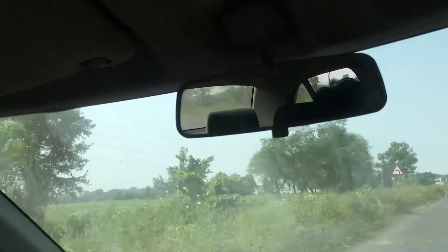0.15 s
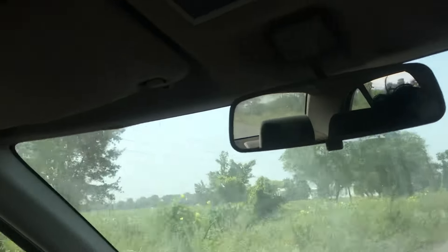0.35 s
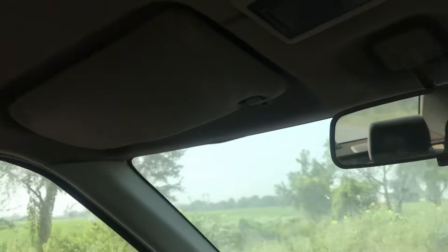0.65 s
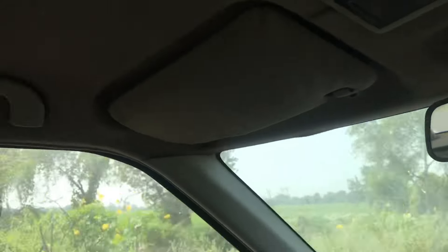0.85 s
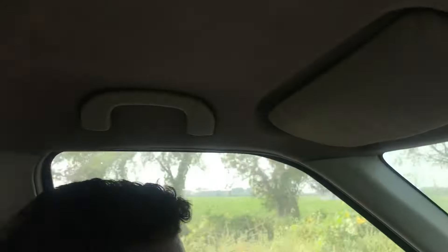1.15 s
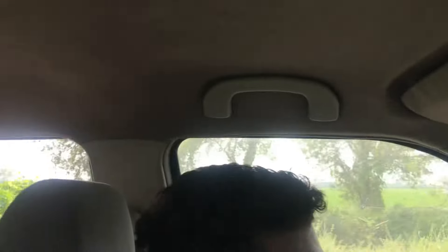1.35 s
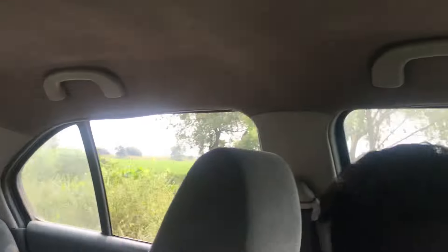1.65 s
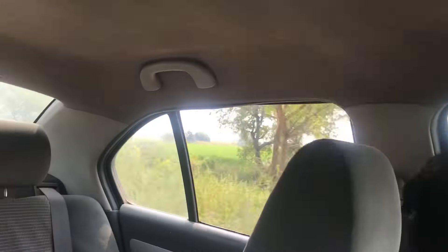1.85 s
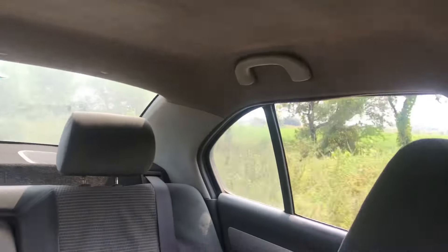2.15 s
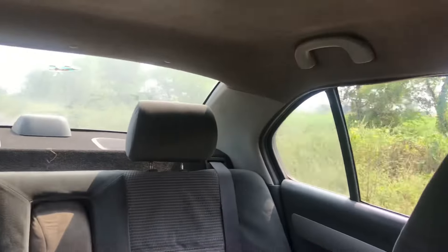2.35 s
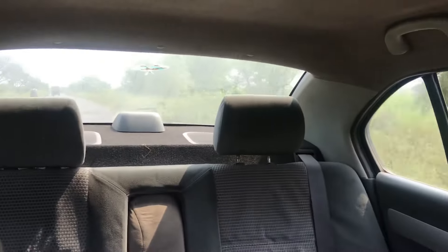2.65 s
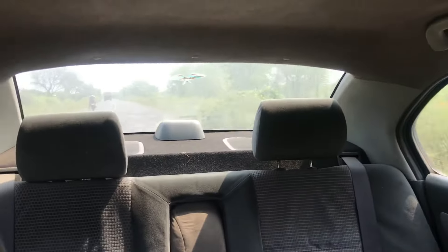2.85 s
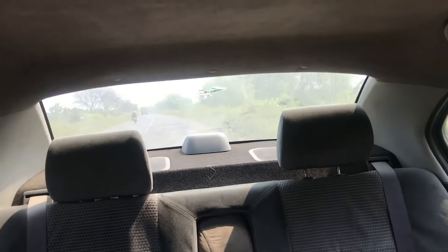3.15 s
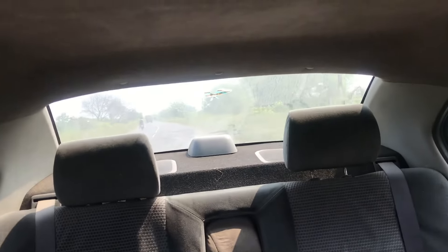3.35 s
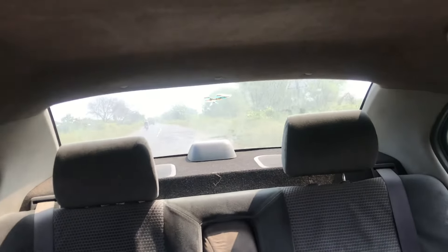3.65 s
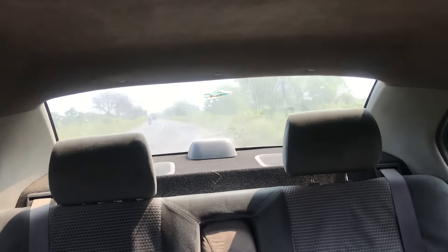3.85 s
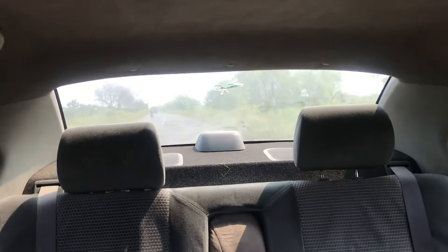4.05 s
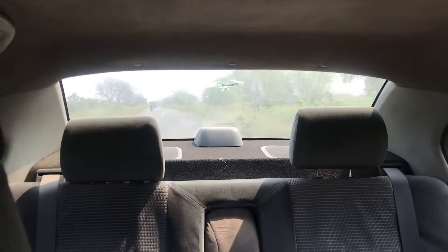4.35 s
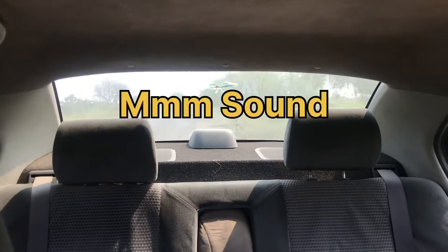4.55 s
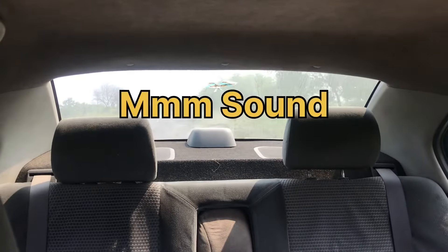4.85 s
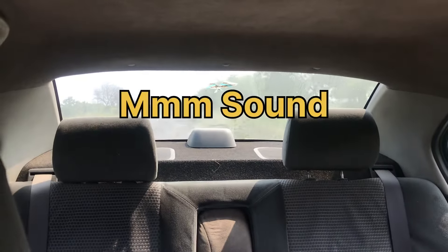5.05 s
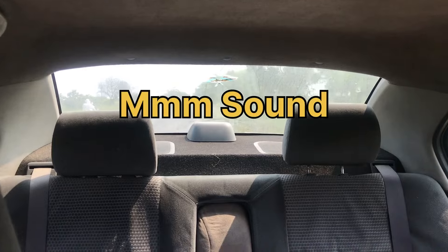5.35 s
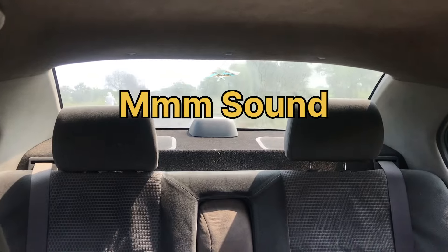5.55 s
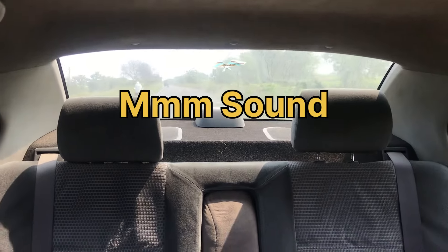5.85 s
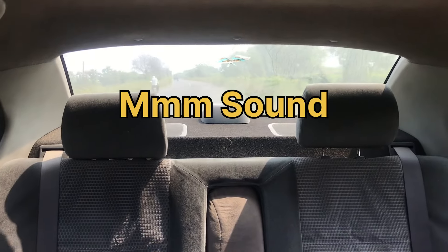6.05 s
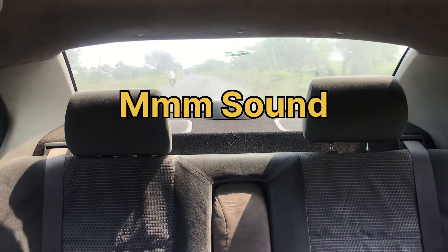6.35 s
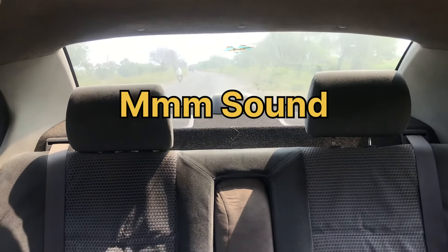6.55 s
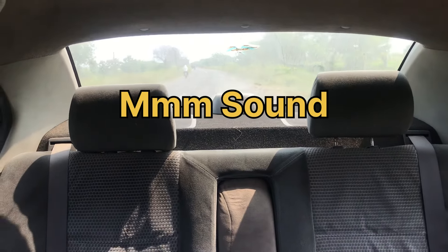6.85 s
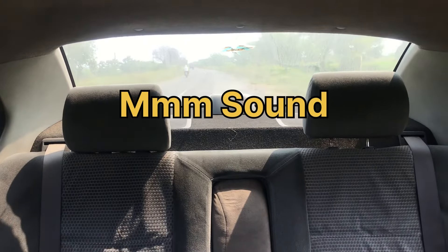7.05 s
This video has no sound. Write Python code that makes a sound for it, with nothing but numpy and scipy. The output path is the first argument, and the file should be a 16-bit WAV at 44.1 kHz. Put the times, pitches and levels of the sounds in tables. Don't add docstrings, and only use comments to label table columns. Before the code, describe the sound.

A microphone in a car cabin turns from windscreen to rear seat. Low engine and bearing hum sits in bassy road noise, with thumps and plastic clacks early on. The ride eases, then trim clatters sharply just before a quick two-note horn blip and a bush swish. Afterwards a steadier hum dominates, with faint ticks, thin panel buzz and a slight tyre moan.

```python
import sys
import numpy as np
from scipy import signal
from scipy.io import wavfile
from scipy.ndimage import uniform_filter1d

SR = 44100
rng = np.random.default_rng(int(sys.argv[2]) if len(sys.argv) > 2 else 0)


def amplitude_ratio(level_db):
    exponent = np.asarray(level_db, float) / 20
    return 10 ** exponent


def inscribe(sig):
    pcm = np.round(np.clip(np.atleast_2d(sig).T, -1, 1) * 32767)
    wavfile.write(sys.argv[1], SR, pcm.astype(np.int16))


N = 317079
TIME = np.arange(N) / SR

# time in seconds, level in dB.
SURFACE = [(0, 0.5), (.4, 1.5), (.55, 3.5), (.95, 6), (1.2, 2), (1.35, 1.5), (1.6, 5), (1.9, 3),
           (2.15, -0.5), (3.0, 0.5), (3.5, 0), (4.0, 2.1), (4.3, -1), (5.4, -3.5), (5.7, -3.5), (6.3, -1.5),
           (7.19, -2.2)]


def evened(x):
    return x / np.sqrt(np.mean(x ** 2) + 1e-20)


def curves(rows):
    s, *columns = np.transpose(rows)
    return [np.interp(TIME, s, column) for column in columns]


def add(mix, s, sound):
    part = mix[round(s * SR):][:len(sound)]
    part += sound[:len(part)]


def resonate(x, hz, width_hz):
    r = np.exp(-np.pi * width_hz / SR)
    turn = np.exp(2j * np.pi * hz / SR)
    return 2 * signal.lfilter([1 - r], [1, -r * turn], x + 0j).real


def drift(rate_hz):
    hz = np.geomspace(.1 * rate_hz, rate_hz, 16)[:, None]
    coarse = TIME[::64]
    waves = np.sin(2 * np.pi * (hz * coarse + rng.random(hz.shape))) / np.sqrt(hz)
    return np.interp(TIME, coarse, evened(waves.sum(0)))


def noise(points, size, patchy_db, flicker_db):
    frames, hz = 4 * N // size + 5, np.fft.rfftfreq(size, 1 / SR)
    a, b, patches = rng.standard_normal((frames, len(hz), 3)).T
    patches = uniform_filter1d(patches, size=9, axis=0)
    patches = evened(uniform_filter1d(patches, size=9, axis=1))
    flicker = evened(uniform_filter1d(rng.standard_normal(frames), size=5))
    f, db = np.transpose(points)
    colour_db = np.interp(np.log(hz + 1), np.log(f + 1), db, left=-90, right=-90)
    z = (a + 1j * b) * amplitude_ratio(colour_db[:, None] + patchy_db * patches + flicker_db * flicker)
    return evened(signal.istft(z, nperseg=size, noverlap=3 * size // 4)[1][:N])


def swells(rows):
    out = np.zeros(N)
    for s, half, db in rows:
        t = np.arange(-3 * half, 3 * half, 1 / SR)
        t = t[t >= -s]
        add(out, s + t[0], amplitude_ratio(db) * np.exp(-(t / half) ** 2))
    return out


def by_facing(levels_db):
    # (0 windscreen, 1 side window, 2 rear pillar, 3 the balance after the
    # shift near 4.2 s).
    facing = [(0, 0.023), (1.3, 0.057), (1.8, 0.65), (2.6, 0.9), (3.35, 0.9), (3.6, 1.5), (4.15, 2.18),
              (4.27, 3), (7.19, 2.91)]
    return np.interp(curves(facing)[0], range(4), levels_db)


def boom_gain():
    # time in seconds, level in dB.
    pumps = [(.29, -16.5), (.52, -17.5), (.64, -14), (.86, -34), (.95, -14.5), (1.11, -22), (1.27, -21),
             (1.46, -18.5), (1.69, -19.5), (1.92, -22.5), (2.08, -25), (2.24, -15), (2.43, -28.5),
             (2.69, -26), (2.84, -21.5), (3.07, -22), (3.25, -28.5), (3.43, -31), (3.68, -16.5), (3.8, -15),
             (3.91, -18), (4.11, -33), (4.24, -24), (4.4, -25), (5.0, -25), (5.2, -32.5), (6.871, -18.5),
             (7.05, -20.5), (7.18, -19)]
    pump_s = 0.054
    return amplitude_ratio(by_facing((-32.5, -26.5, -36, -38))) + swells([(s, pump_s, db) for s, db in pumps])


def engine_drone():
    # time in seconds, turning rate in Hz.
    speed = [(0, 22.8), (.8, 22.6), (1.4, 22.3), (2.6, 21.5), (3.2, 21.22), (3.8, 20.72), (4.4, 20.01),
             (5.0, 19.28), (5.6, 18.68), (5.9, 18.61), (6.2, 18.74), (6.5, 18.99), (6.8, 19.41),
             (7.19, 20.1)]
    # multiple of the
    # base rate, then front, side, pillar and late levels in dB.
    partials = [(3.05, -20, -27.5, -26.5, -31.5), (6, -39, -38, -37, -37.5), (8, -20.5, -32.5, -39, -31),
                (10, -44.5, -32, -38.5, -23.5), (14, -38.5, -40, -40.5, -43.5),
                (16, -57, -64, -58.5, -33.5)]
    turns = np.cumsum(curves(speed)[0]) / SR
    drone = np.zeros(N)
    for multiple, *levels_db in partials:
        level_db = by_facing(levels_db) + 1.5 * drift(12) + .7 * drift(1.5)
        drone += amplitude_ratio(level_db) * np.sin(2 * np.pi * multiple * turns + .25 * drift(9.8))
    throb_gain = amplitude_ratio(-6) * boom_gain() + amplitude_ratio(-39.5)
    throb = throb_gain * np.sin(2 * np.pi * 6 * turns + .5 * drift(14))
    return np.sqrt(2) * (drone + throb)


def road_rumble():
    # pitch in Hz, level in dB per Hz.
    rumble_colour = [(14, -46.5), (27, -21.5), (40, -2), (60, -11.5), (85, -15.5), (110, -9.5), (150, -19),
                     (200, -32.5)]
    drum_colour = [(100, -20), (150, 0), (200, 4), (260, 0.5), (340, -10), (420, -13)]
    # time in seconds, level in dB.
    jolts = [(.18, -17.5), (.35, -35), (.57, -8), (.69, -18.5), (.8, -14), (.91, -16), (1.12, -14.5),
             (1.27, -16), (1.55, -18), (1.7, -32.5), (1.9, -14.5), (2.309, -18), (2.6, -44), (2.9, -25.5),
             (3.16, -17), (3.32, -30.5), (3.52, -29), (3.72, -19), (3.99, -25.5), (4.24, -30.5),
             (4.79, -30.5), (5.65, -28.5), (5.82, -31.5), (6.47, -32), (6.97, -26.5), (7.18, -25)]
    jolt_s = 0.04
    surface_db = curves(SURFACE)[0]
    steady = amplitude_ratio(by_facing((-21, -21.5, -16, -24)) + 0.78 * surface_db)
    shake = steady + swells([(s, jolt_s, db) for s, db in jolts])
    rumble = amplitude_ratio(-3.5) * shake * noise(rumble_colour, size=4096, patchy_db=1.5, flicker_db=-2.5)
    drum_gain = shake ** 0.37 * amplitude_ratio(0.43 * surface_db - 22)
    return rumble + drum_gain * noise(drum_colour, size=2048, patchy_db=1.33, flicker_db=0)


def floor_thumps():
    # middle in seconds, half length in seconds, level in dB.
    thump_times = [(.55, 0.048, -33), (.8, 0.013, -23), (1.24, 0.047, -29), (1.5, 0.044, -39),
                   (2.25, .02, -29.5), (2.98, 0.018, -32), (3.75, .04, -43), (4.0, 0.033, -39),
                   (4.19, .03, -36)]
    # pitch in Hz, level in dB per Hz.
    thump_colour = [(180, -18), (260, -0.5), (420, 3.5), (650, -6), (1000, -23), (1600, -33)]
    return swells(thump_times) * noise(thump_colour, size=1024, patchy_db=4, flicker_db=4.3)


def cabin_boom():
    boom_hz = 132.7
    boom = resonate(rng.standard_normal(N), boom_hz, width_hz=27.6)
    boom = resonate(boom, boom_hz, width_hz=54)
    return amplitude_ratio(-2.5) * boom_gain() * evened(boom)


def tyre_roar():
    # pitch in Hz, level in dB per Hz.
    roar_colour = [(190, -30.5), (330, -0.5), (469, -5.5), (533, -10), (794, -9.5), (1060, -14.5),
                   (1160, -17), (1380, -20), (2210, -32.5), (3000, -40.5), (3900, -46.5), (6600, -120)]
    gain = amplitude_ratio(-40.5 + curves(SURFACE)[0] + 3.5)
    return gain * noise(roar_colour, size=1024, patchy_db=1.5, flicker_db=0.67)


def tread_moan():
    # pitch in Hz, width in Hz, level in dB.
    whistles = [(686, 55, -46.5), (1680, 91, -61.5)]
    moan = np.zeros(N)
    for hz, width_hz, db in whistles:
        tone = resonate(rng.standard_normal(N), hz, width_hz)
        moan += amplitude_ratio(db) * evened(resonate(tone, hz, 4 * width_hz))
    start_s, fade_s = 5.6, 0.067
    return moan * np.clip((TIME - start_s) / fade_s, 0, 1)


def trim_rattles():
    # time in seconds, peak in dB, knock below 2.5 kHz and clack near 4 kHz in relative dB.
    rattles = [(0.405, -40.5, -6, -6), (0.5162, -47, 10, -13), (0.534, -44.5, 10, -6),
               (0.5681, -44.5, 9, 0), (0.7324, -39.5, 2, -4.5), (0.8353, -43.5, -11, -20),
               (0.8903, -38.5, 10.5, 2), (0.9372, -46.5, 13, -13), (1.0445, -34.5, -9, -9),
               (1.072, -39, 9, 0.5), (1.2099, -39.5, -15, -12.5), (1.428, -39, -1, -11),
               (1.6008, -30.5, 4.5, -3), (1.6834, -37, -3, -7.5), (1.7355, -37.5, -1, -6.5),
               (1.7683, -35, -3, -22), (1.8535, -29, -3.5, -9.5), (2.4123, -42.5, 2, -8.5),
               (2.5077, -43, -3, -13), (2.8598, -40.5, -2, -9.5), (3.1598, -42, 2, -6.5),
               (3.731, -33.5, 5, -9.5), (3.9104, -36, 4, -2.5), (3.9673, -35, 4.5, -9),
               (3.9999, -23, -2.5, -10), (4.0772, -38.5, 1, -9), (4.1425, -29, -1, -8.5),
               (4.1603, -36.5, -8, -15), (4.1804, -29, 6, -5.5), (4.2538, -31, -16, -16.5)]
    # time in seconds, peak in dB.
    ticks = [(0.293, -48), (0.465, -47.5), (0.6542, -57), (0.789, -47.5), (1.1318, -45), (1.478, -40),
             (1.6687, -42), (2.097, -52), (2.7055, -50.5), (2.9408, -45), (3.283, -51), (3.3423, -53),
             (3.4176, -52.5), (3.5022, -46.5), (3.604, -47), (3.656, -45.5), (3.771, -41.5), (3.828, -46.5),
             (4.3216, -47), (5.8143, -50), (6.393, -48.5), (6.6787, -50.5), (6.8605, -54), (7.0292, -50.5),
             (7.138, -45.5)]
    # pitch in Hz, width in Hz, level in dB.
    trim_modes = [(1090, 680, 17), (1860, 470, 5.5), (2840, 880, 6), (3780, 1000, 6), (5300, 1200, -3.5),
                  (6260, 2400, 3), (8790, 1800, -2), (11500, 2200, 0.5)]
    ring_s = 0.064
    tick_rows = [(s, db, 5, -7) for s, db in ticks]
    out, t = np.zeros(N), np.arange(6000) / SR
    for s, peak_db, knock_db, clack_db in list(rattles) + tick_rows:
        unevenness = evened(uniform_filter1d(rng.standard_normal(len(t)), size=60))
        chatter = rng.standard_normal(len(t)) * (1 + 0.45 * unevenness)
        for hz, width_hz, mode_db in trim_modes:
            level_luck, pitch_luck = rng.standard_normal(2)
            if hz < 2500:
                colour_db = knock_db - 6.5
            elif hz < 7500:
                colour_db = clack_db + 3.5
            else:
                colour_db = 0
            hz *= 1 + 0.036 * pitch_luck
            ring = resonate(chatter, hz, width_hz)
            ring = evened(resonate(ring, hz, 3.24 * width_hz))
            slow = (8000 / hz) ** .5
            shape = 1 - np.exp(-t / (0.0024 * slow ** 1.24))
            shape *= amplitude_ratio(-60 * t / (ring_s * slow ** 0.5))
            shape *= 1 + 0.64 * np.exp(-t / 0.0078) / slow ** 2
            level_db = peak_db - 11 + mode_db + 1.14 * level_luck + colour_db
            add(out, s - .001, amplitude_ratio(level_db) * shape * ring)
    return signal.sosfilt(signal.butter(6, 13800, fs=SR, output="sos"), out)


def trim_squeaks():
    # start in seconds, length in seconds, first and last pitch in Hz, level in dB.
    squeaks = [(.682, .016, 3800, 4100, -51), (1.615, .12, 4500, 4600, -48), (2.428, .032, 1620, 1800, -44),
               (2.49, .065, 4150, 3900, -57), (2.548, .032, 3350, 3100, -58),
               (2.553, .018, 3900, 3550, -56), (3.825, .025, 1800, 1750, -46),
               (3.915, .04, 3050, 3000, -55), (4.585, .07, 4600, 4550, -55), (4.59, .06, 2200, 2120, -48)]
    out = np.zeros(N)
    for s, length_s, first_hz, last_hz, db in squeaks:
        hz = np.linspace(first_hz, last_hz, int(length_s * SR))
        hz = hz * (1 + .02 * evened(uniform_filter1d(rng.standard_normal(len(hz)), size=200)))
        flutter = 1 + 1.1 * evened(uniform_filter1d(rng.standard_normal(len(hz)), size=110))
        tone = np.sin(2 * np.pi * np.cumsum(hz) / SR)
        add(out, s, amplitude_ratio(db) * flutter * np.hanning(len(hz)) * tone)
    return out


def firing_ticks():
    # middle in seconds, half length in seconds, level in dB.
    buzz_times = [(5.0, .15, -69), (5.3, .13, -64.5), (5.9, .12, -67), (6.22, .17, -65)]
    # pitch in Hz, width in Hz, level in dB.
    panel_modes = [(5500, 1800, 4), (9600, 1500, -5), (11800, 2200, -2)]
    taps = 58.3 * TIME
    strength_db = 1.5 * rng.standard_normal(500)[taps.astype(int)]
    grit = (1.5 + rng.standard_normal(N)) * rng.choice([-1, 1], N)
    puffs = np.exp(-(taps % 1) / .17) * amplitude_ratio(strength_db) * grit
    ring = np.zeros(N)
    for hz, width_hz, db in panel_modes:
        ring += amplitude_ratio(db) * resonate(resonate(puffs, hz, width_hz), hz, 2 * width_hz)
    ring = signal.sosfilt(signal.butter(6, 13500, fs=SR, output="sos"), ring)
    return swells(buzz_times) * evened(ring)


def horn():
    # pitch in Hz, on and off times in seconds, level in dB.
    horn_pair = [
        (502.5, 4.327, 4.513, -32.5),
        (398.6, 4.33, 4.535, -36.5),
    ]
    # multiple of the pitch, level in dB.
    high_overtones = [(1, 0), (2, -4), (3, -9), (4, -18), (5, -12), (6, -15), (7, -17.5), (8, -33),
                      (9, -28), (10, -37), (11, -41), (12, -43), (13, -32), (14, -41), (15, -42), (16, -47),
                      (17, -45), (18, -44), (19, -44), (20, -47), (21, -48), (22, -42), (23, -43),
                      (24, -42), (25, -42), (26, -42)]
    low_overtones = [(1, -0.5), (2, -5.5), (3, -5.5), (4, -6.5), (5, -13), (6, -14.5), (7, -22), (8, -24)]
    out, t = np.zeros(N), np.arange(SR // 2) / SR
    for (hz, on, off, level_db), overtones in zip(horn_pair, (high_overtones, low_overtones)):
        turns = np.cumsum(hz * (1 - 0.0315 * np.exp(-t / 0.0116))) / SR
        stop = np.exp(-np.maximum(t - off + on, 0) / .006)
        for k, db in overtones:
            late, phase, sway = rng.random(3)
            delay_s = (0.0073 + 0.027 * late) * (k > 1)
            swing = 1 - np.exp(-np.maximum(t - delay_s, 0) / 0.0069)
            waver_db = 1.1 * np.sin(2 * np.pi * ((5 + 9 * late) * t + sway))
            waver_db = waver_db * (1 + .2 * k)
            tone = np.cos(2 * np.pi * (k * turns + phase))
            add(out, on, amplitude_ratio(level_db + db + 6 + waver_db) * swing * stop * tone)
    out = out * (1 + amplitude_ratio(-24) * evened(uniform_filter1d(rng.standard_normal(N), size=12)))
    echo = signal.lfilter([1], [1, -.6], rng.standard_normal(len(t)))
    echo = echo * amplitude_ratio(-60 * t / .3) * (t > .006)
    return out + amplitude_ratio(-18) * signal.fftconvolve(out, echo / np.linalg.norm(echo))[:N]


def bushes():
    # closest moment in seconds, half length in seconds, level in dB.
    bush_times = [(.58, 0.09, -63.5), (.93, .14, -54.5), (1.63, 0.15, -46.5), (4.0, 0.28, -73.5),
                  (4.19, 0.039, -60.5), (4.67, 0.11, -48.5), (7.19, 0.018, -80)]
    # pitch in Hz, level in dB per Hz.
    swish_colour = [(940, -33), (1600, -3.5), (1970, -6.5), (2130, -4.5), (2530, -2.5), (2730, -5.5),
                    (4560, -8.5), (5010, -9.5), (7130, -14.5), (7620, -20), (9210, -16.5), (10200, -17),
                    (12700, -13.5), (15600, -35.5)]
    # pitch in Hz, width in Hz, level in dB.
    rasp_modes = [(2330, 590, 1), (3300, 810, -1.5), (4260, 290, -4.5)]
    steady = amplitude_ratio(by_facing((-55.5, -59.5, -58, -58.5)) + .3 * curves(SURFACE)[0])
    leaves = steady + swells(bush_times)
    swish = leaves * noise(swish_colour, size=512, patchy_db=1.5, flicker_db=1.5)
    rasp = np.zeros(N)
    for hz, width_hz, db in rasp_modes:
        rasp += amplitude_ratio(db) * resonate(rng.standard_normal(N), hz, width_hz)
    return swish + amplitude_ratio(12) * leaves ** 1.496 * evened(rasp)


def scene():
    road = road_rumble() + floor_thumps() + cabin_boom() + tyre_roar() + tread_moan()
    trim = trim_rattles() + trim_squeaks() + firing_ticks()
    return (engine_drone() + road + trim + horn() + bushes())[None]


def top_cut(x):
    return signal.sosfilt(signal.butter(12, 15700, fs=SR, output="sos"), x)


def record(dry):
    ceiling = .8
    return top_cut(ceiling * np.tanh(dry / ceiling))


dry = scene()
out = record(dry)
inscribe(out)
```